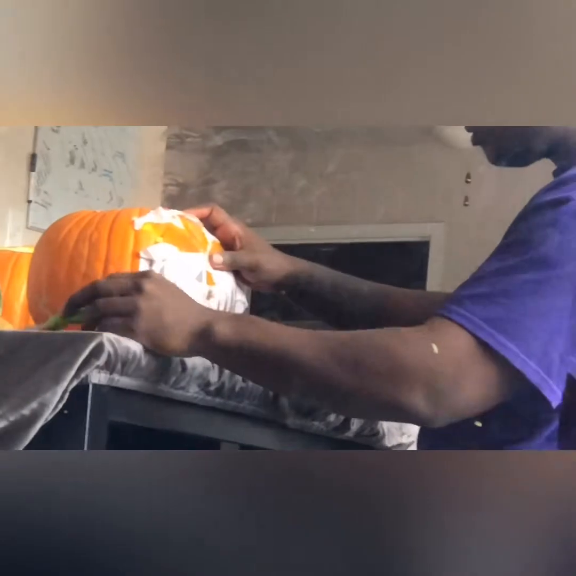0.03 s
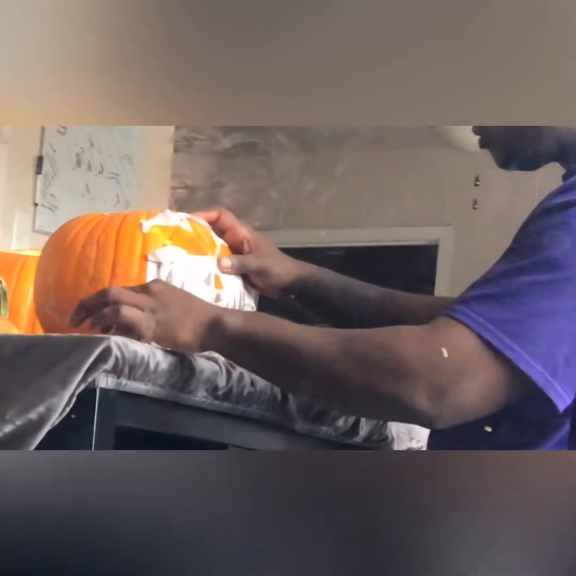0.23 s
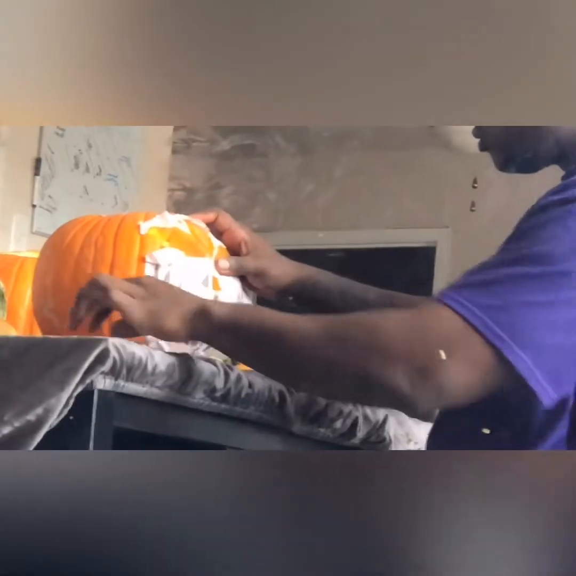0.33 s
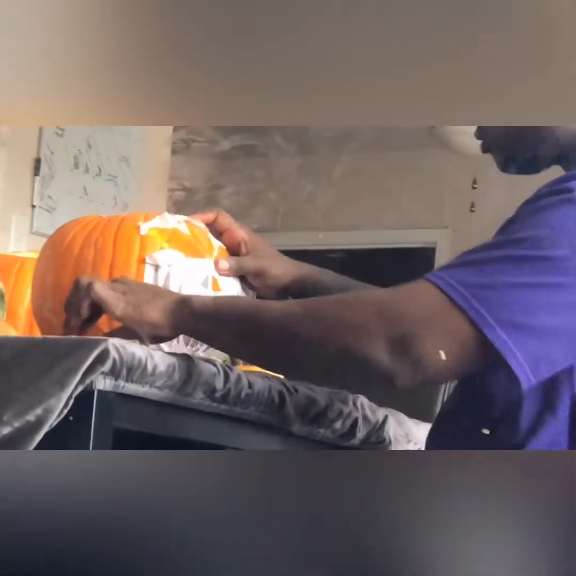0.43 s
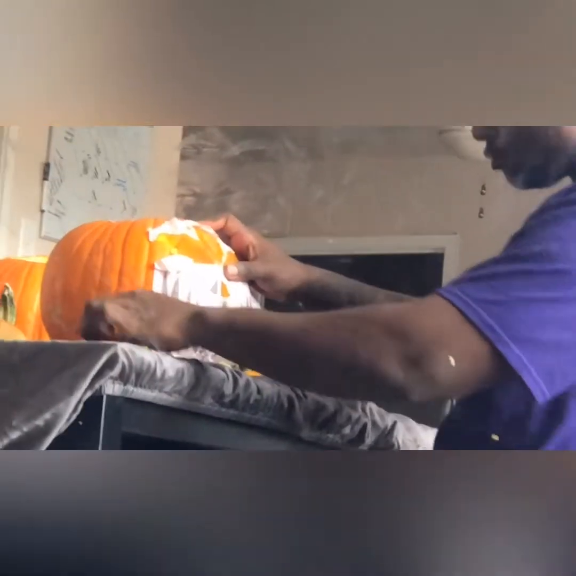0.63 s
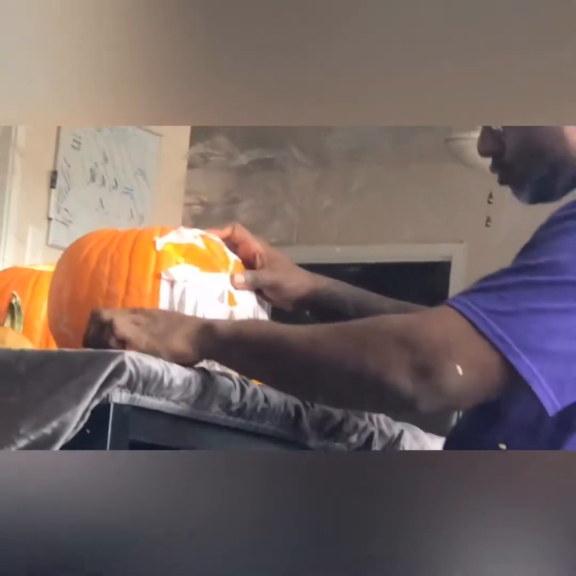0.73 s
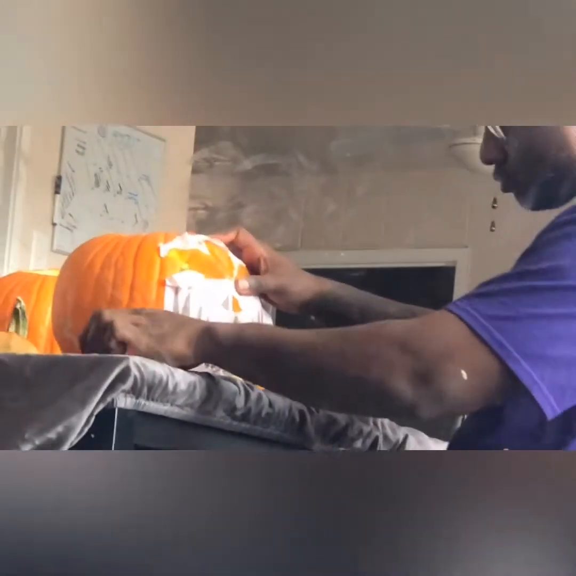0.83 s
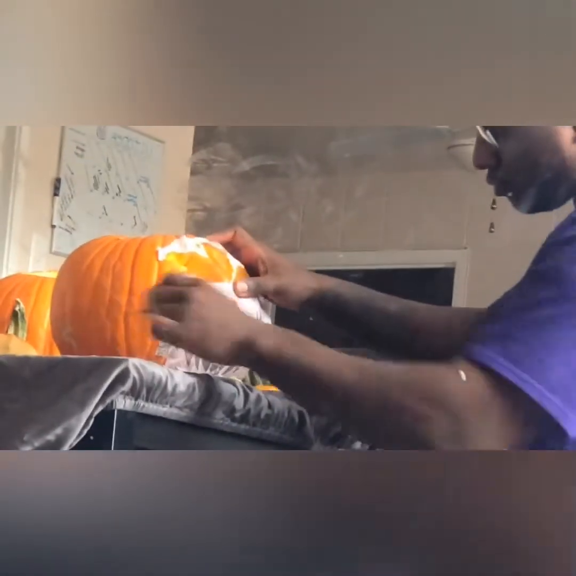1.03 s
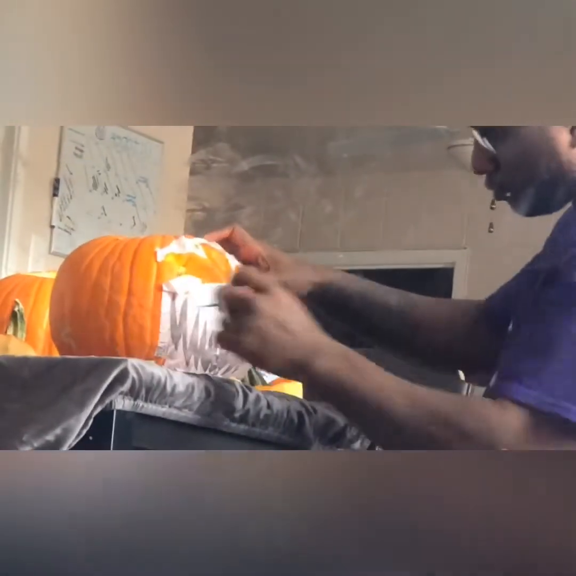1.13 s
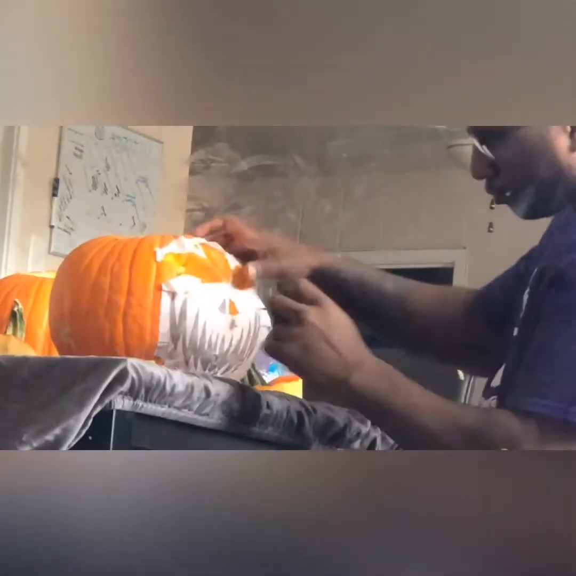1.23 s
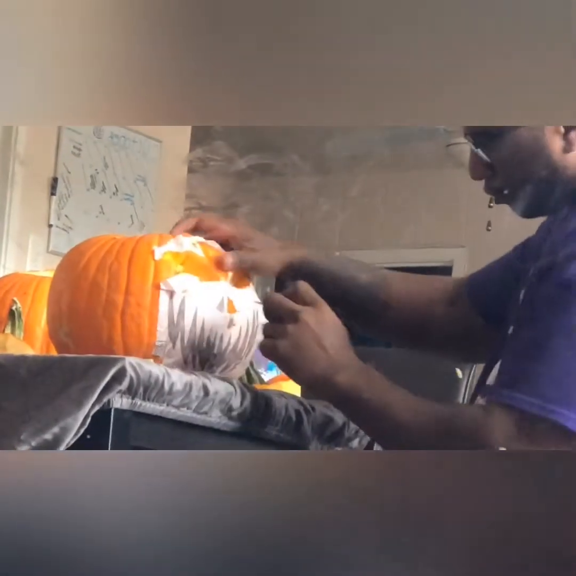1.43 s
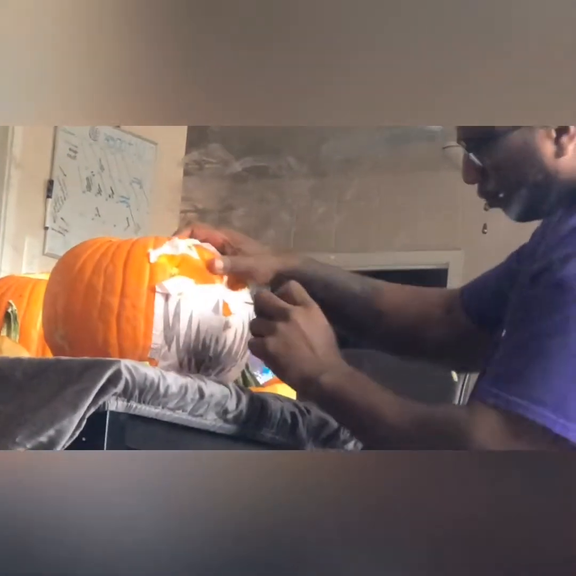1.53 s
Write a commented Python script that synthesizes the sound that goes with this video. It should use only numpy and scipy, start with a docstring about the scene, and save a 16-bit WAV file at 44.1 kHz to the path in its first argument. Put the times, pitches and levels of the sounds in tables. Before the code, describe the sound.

One sharp knock with a hollow thud sounds as a tool lands on a table, with a dull thump just before and after. Brief cloth rustling and faint taps follow, heard by one microphone in a quiet, humming room.

```python
"""A bare, quiet room with an appliance humming low; one microphone, hearing a cloth-covered table.
A small hard tool is put down beside a pumpkin: first a dull thump, then at 0.2 s one sharp knock,
the crack of the contact over the hollow thud of the top. A softer thump follows. From half a second on
a hand brushes over the cloth and things on the table tap lightly, a last faint time near 1.25 s.
The room rings after each blow and dies away into the hum."""
import sys
import numpy as np
from scipy import signal
from scipy.fft import rfft, irfft
from scipy.io import wavfile

SR = 44100
rng = np.random.default_rng(int(sys.argv[2]) if len(sys.argv) > 2 else 0)


def transcribe(u):
    """Save the signal u as a 16-bit wav file named by the first command-line argument.

    u: samples, shape (n,) or (channels, n), limited to [-1, 1]; the rate is SR.
    q: integer samples, one column per channel.
    """
    v = np.clip(np.atleast_2d(u).T, -1, 1)
    q = np.round(v * 32767).astype(np.int16)
    wavfile.write(sys.argv[1], SR, q)


N = 70560

# spectrum of the room tone: frequency_hz, relative_db
ROOM_TONE_SPECTRUM = [(20, -33), (40, -14), (70, -8), (105, -8.5), (140, -1), (200, -3.5), (310, -7),
                      (420, -14.5), (600, -20), (1000, -24.5), (2000, -30), (5000, -36), (10000, -40.5),
                      (15500, -44)]
# tones of the appliance: pitch_hz, rms_level_db
HUM_TONES = [(138, -68.5), (178, -68.5), (238, -76), (360, -65), (479, -77)]
# first reflections from nearby surfaces: delay_s, gain_db
REFLECTIONS = [(.0025, -15), (.005, -18), (.0134, -21), (0.0254, -19)]
# reverberation time of the room: frequency_hz, t60_s
REVERB_DECAY = [(120, 0.5), (320, 0.78), (840, 0.73), (2200, 0.5628), (4500, 0.68), (9000, 0), (15000, 0.1)]
# reverberation against the direct sound at the microphone: frequency_hz, gain_db
REVERB_SPECTRUM = [(100, 4), (280, -3), (800, -1.5), (1200, 1.5), (2000, -7), (2700, -7.5), (3500, -10.5),
                   (5000, -4.5), (12000, -4)]
# low resonances of the room, at a thud gain of 0 dB: pitch_hz, level_db, t60_s
ROOM_MODES = [(134.85, -54, 1.0), (293.2, -42.5, 0.99), (398.8, -41, .85), (479.2, -45, .3), (688, -44, .4),
              (729, -43, .5), (845, -41, .55), (878, -43, 0.52), (1196, -51, .4), (1352, -49, .4)]
# strokes of hand and tool over the cloth: peak_s, rise_s, fall_s, level_db, tilt_db_per_octave
CLOTH_STROKES = [(0.0, .01, 0.063, -64.5, -5), (0.14, 0.1, .1, -72.5, 9), (0.555, 0.027, .02, -72, 2.5),
                 (0.5925, 0.0077, 0.012, -41.5, -1), (0.625, .02, 0.061, -54, 0),
                 (0.785, 0.022, .02, -69, -1.5), (0.865, 0.012, 0.016, -73, -1),
                 (1.25, .003, .013, -65.5, 5.5), (1.24, .03, .06, -73.5, .5),
                 (1.327, 0.011, .015, -71, -3.5)]
# spectrum of the rubbing: frequency_hz, relative_db
CLOTH_SPECTRUM = [(100, -18), (500, -7), (1200, 0), (2000, 1), (2600, -2), (3200, 2), (4400, 0), (6500, -8),
                  (8500, -15), (12000, -20.5), (16000, -27)]
# hollow thud of the top, with its broad resonances: frequency_hz, gain_db
THUD_SPECTRUM = [(50, -17), (110, -5), (250, 16.5), (370, 14), (480, 19), (590, 14.5), (680, 17.5),
                 (760, 14.5), (860, 18.5), (1040, 6), (1400, 10), (1800, 0), (2300, -15), (3200, -24),
                 (5000, -52), (15000, -75)]
# crack of the hard contact when pitched at CRACK_PITCH_HZ: frequency_hz, gain_db
CRACK_SPECTRUM = [(50, -30), (500, -12), (1130, -1), (1600, 17), (2030, 20.5), (2600, 13.5), (3400, 0),
                  (4100, -5), (4800, -20), (7000, -37), (9000, -48), (15000, -58)]
CRACK_PITCH_HZ = 2030
# blows on the table: start_s, thud_gain_db, crack_gain_db, crack_pitch_hz
BLOWS = [(0.0682, -14.5, -38, 2500), (0.2154, -.5, 1.5, 2003), (0.3347, -15.5, -45, 2600),
         (0.5135, -31, -43, 1600), (0.6438, -25, -25.5, 1900), (0.657, -39, -36, 1570),
         (0.726, -30, -43, 1690), (0.766, -43, -48, 2500), (1.248, -47, -50, 1740)]


def amp(db):
    """Decibels to gain."""
    return 10 ** (np.asarray(db) / 20)


def unit(x):
    """Scales to rms 1."""
    return x / np.sqrt(np.mean(x ** 2) + 1e-20)


def read(points, hz):
    """Reads a table on a log-frequency axis."""
    table_hz, value = np.transpose(points)
    return np.interp(np.log(hz + 1), np.log(table_hz + 1), value)


def add(mix, start_s, sound):
    """Mixes a sound in at a time."""
    part = mix[max(round(start_s * SR), 0):][:len(sound)]
    part += sound[:len(part)]


def colour(x, spectrum, tilt_db=0):
    """Gives a signal a spectrum, tilted by tilt_db per octave about 4 kHz."""
    hz = np.fft.rfftfreq(len(x), 1 / SR)
    octaves = np.log2(np.maximum(hz, 500) / 4000)
    return irfft(rfft(x) * amp(read(spectrum, hz) + tilt_db * octaves), len(x))


def drift(rate_hz):
    """Random wandering of rms 1, mostly slower than rate_hz."""
    hz = np.fft.rfftfreq(N, 1 / SR)
    return unit(irfft(rfft(rng.standard_normal(N)) * np.exp(-(hz / rate_hz) ** 2), N))


def room_tone(level_db=-60.5):
    """The quiet room itself: steady noise, mostly bass."""
    return amp(level_db) * unit(colour(rng.standard_normal(N), ROOM_TONE_SPECTRUM))


def appliance_hum(waver=.33, waver_hz=4.2):
    """Low tones of an appliance, each wavering in level and phase."""
    t, hum = np.arange(N) / SR, np.zeros(N)
    for hz, level_db in HUM_TONES:
        swell = 1 + waver * drift(waver_hz)
        phase = 2 * np.pi * (hz * t + rng.random()) + waver * drift(waver_hz)
        hum += amp(level_db) * unit(swell * np.sin(phase))
    return hum


def early_reflections(direct):
    """Nearby surfaces each send the microphone one late, weaker copy."""
    out = np.zeros(N)
    for delay_s, gain_db in REFLECTIONS:
        add(out, delay_s, amp(gain_db) * direct)
    return out


def room_reverb(x, gap_s=.0021, rise_s=.0031):
    """The bare room answers with dense reflections of random sign, each band dying at its own speed."""
    step = 10  # samples per reflection
    taps, slots = np.zeros(N), np.arange(0, N - step, step)
    signs = rng.choice([-1., 1.], len(slots))
    taps[slots + rng.integers(0, step, len(slots))] = signs * np.sqrt(step)
    hz, t, bands = signal.stft(taps, SR, nperseg=256)
    decay_rate = np.log(1000) / read(REVERB_DECAY, hz)[:, None]
    decay = np.sqrt(2 * decay_rate / SR) * np.exp(-decay_rate * t)  # unit energy
    bands = bands * amp(read(REVERB_SPECTRUM, hz))[:, None] * decay
    tail = signal.istft(bands, SR, nperseg=256)[1][:N]
    onset = np.clip((np.arange(N) / SR - gap_s) / rise_s, 0, 1)
    return signal.fftconvolve(x, tail * onset)[:N]


def room_ring(rise_s=.0031):
    """Low resonances of the room ring on after a blow as decaying tones."""
    t, tones = np.arange(SR) / SR, np.zeros(SR)
    for hz, level_db, t60_s in ROOM_MODES:
        decay = np.exp(-np.log(1000) * t / t60_s)
        tones += amp(level_db) * decay * np.sin(2 * np.pi * (hz * t + rng.random()))
    return tones * np.minimum(t / rise_s, 1)


def cloth_strokes(grain_db=3.5, grain_hz=625):
    """Hand and tool rub the cloth: grainy friction noise that swells and dies with each stroke."""
    t, out = np.arange(N) / SR, np.zeros(N)
    for peak_s, rise_s, fall_s, level_db, tilt_db in CLOTH_STROKES:
        grains = rng.standard_normal(N) * amp(grain_db * drift(grain_hz))
        swell = np.exp(-(np.minimum(t - peak_s, 0) / rise_s) ** 2 - np.maximum(t - peak_s, 0) / fall_s)
        out += amp(level_db) * swell * unit(colour(grains, CLOTH_SPECTRUM, tilt_db))
    return out


def table_impact(spectrum, pitch_ratio=1, travel_at_1khz_s=.0012):
    """A click spread into a quick downward chirp: bending waves in the top carry the treble fastest."""
    size = 4096
    hz = np.fft.fftfreq(size, 1 / SR)
    log_gain = np.log(amp(read(spectrum, abs(hz) / pitch_ratio)))
    response = np.exp(np.conj(signal.hilbert(log_gain)))  # minimum phase: no sound before the blow
    travel_phase = 4 * np.pi * travel_at_1khz_s * np.sign(hz) * np.sqrt(1000 * abs(hz))
    return np.fft.ifft(response * np.exp(-1j * travel_phase)).real[:size // 2]


def table_knocks(thud_lag_s=.0011):
    """Each blow is a crack of contact, then the thud of the top; returns these and the room's ringing."""
    blows, ringing = np.zeros(N), np.zeros(N)
    for start_s, thud_db, crack_db, crack_hz in BLOWS:
        add(blows, start_s, amp(crack_db) * table_impact(CRACK_SPECTRUM, crack_hz / CRACK_PITCH_HZ))
        add(blows, start_s + thud_lag_s, amp(thud_db) * table_impact(THUD_SPECTRUM))
        add(ringing, start_s + thud_lag_s, amp(thud_db) * room_ring())
    return blows, ringing


def scene():
    """What reaches the microphone: blows and strokes, direct and off the room, over the background."""
    blows, ringing = table_knocks()
    rubbing = cloth_strokes()
    direct = blows + rubbing
    reverb = room_reverb(blows + amp(2) * rubbing)  # strokes reach the microphone less directly
    return (direct + early_reflections(direct) + reverb + ringing + appliance_hum() + room_tone())[None]


def record(dry):
    """The recorder's band limit: a steep cut of the highest treble."""
    lowpass = signal.firwin(511, cutoff=15850, window=("kaiser", 9), fs=SR)
    return signal.oaconvolve(dry, lowpass[None], "same")


dry = scene()
out = record(dry)
transcribe(out)
```